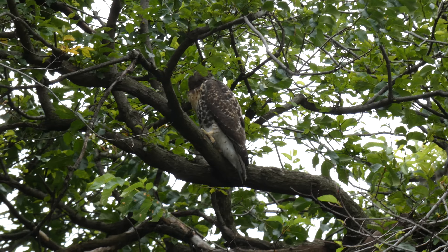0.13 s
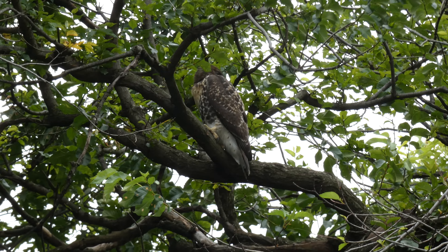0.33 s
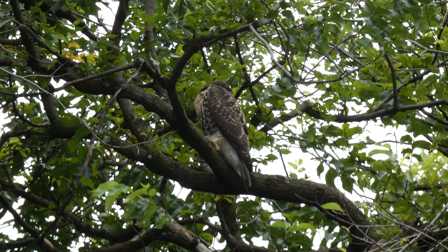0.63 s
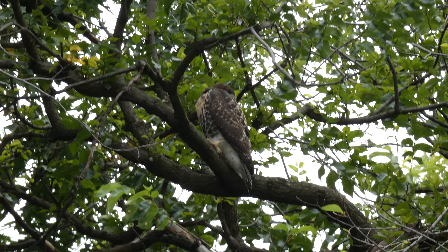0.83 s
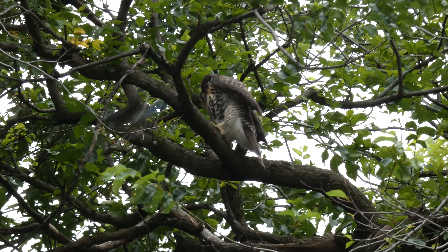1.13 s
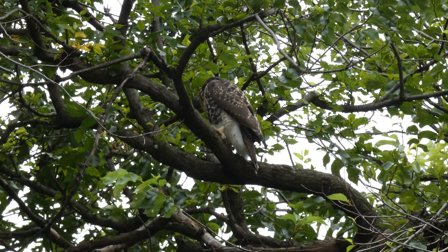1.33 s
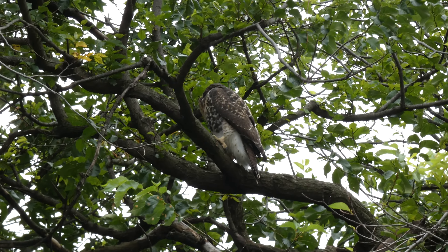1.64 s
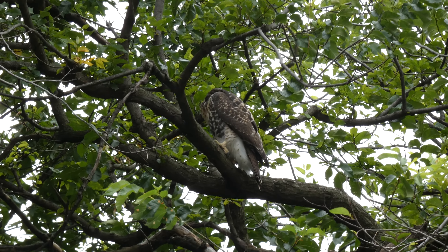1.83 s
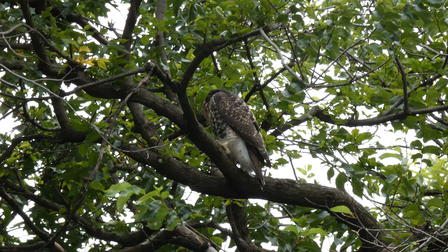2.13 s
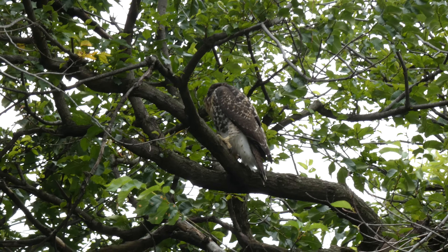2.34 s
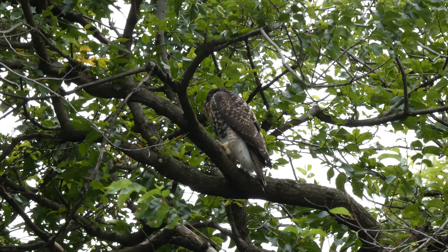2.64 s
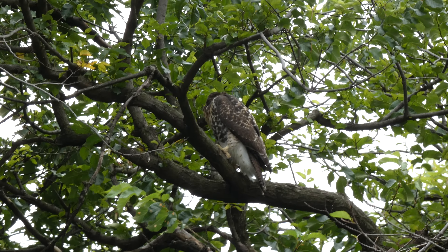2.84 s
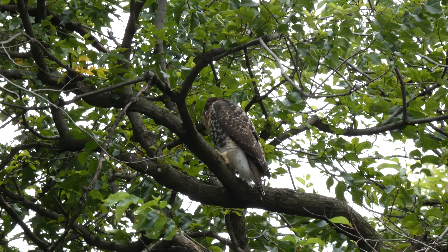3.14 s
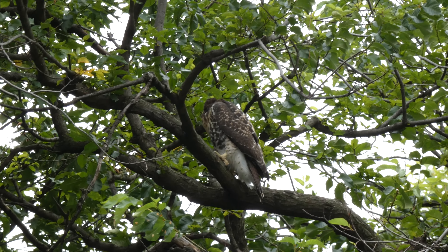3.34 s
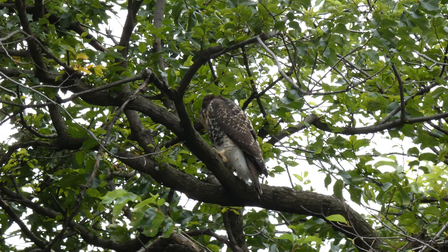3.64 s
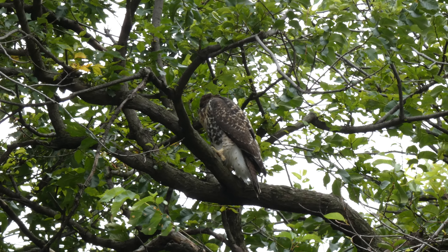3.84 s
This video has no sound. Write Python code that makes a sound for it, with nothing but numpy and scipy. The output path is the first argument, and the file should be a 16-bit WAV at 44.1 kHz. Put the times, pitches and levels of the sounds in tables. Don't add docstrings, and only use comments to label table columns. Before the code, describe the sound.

Four piercing jay screeches rise quickly, sag and end hoarse, echoing among park branches. One distant dog bark precedes them, with tiny bird chirps, leaf rustle, microphone bumps and constant low traffic drone.

```python
import sys
import numpy as np
from scipy import signal
from scipy.fft import rfft, irfft
from scipy.io import wavfile
from scipy.ndimage import uniform_filter1d

SR = 44100
rng = np.random.default_rng(int(sys.argv[2]) if len(sys.argv) > 2 else 0)


def materialize(psi):
    bounded = np.clip(np.atleast_2d(psi).T, -1, 1)
    quanta = np.round(bounded * 32767).astype(np.int16)
    wavfile.write(sys.argv[1], SR, quanta)


def invert_db(level):
    return 10 ** (np.asarray(level, dtype=float) / 20)


N = 176400
T = np.arange(N) / SR


def colour(x, points):
    hz, db = np.array(points).T
    f = np.maximum(np.arange(N // 2 + 1) * SR / N, 1)
    gain = invert_db(np.interp(np.log(f), np.log(hz), db))
    return irfft(rfft(x) * gain, N)


def unit(x):
    return x / np.sqrt(np.mean(x ** 2))


def walk(rate):
    k = int(SR / rate)
    held = np.repeat(rng.standard_normal(N // k + 1), k)
    return 1.3 * uniform_filter1d(uniform_filter1d(held, k), k)[:N]


def ramp(t, span):
    return np.clip(t / span, 0, 1)


def pan(x, db):
    return x * invert_db(np.array([[db / 2], [-db / 2]]))


STIR = .3


def tail(x, t60, db, gap):
    t = T[:SR]
    h = rng.standard_normal((2, SR)) * invert_db(-60 * t / t60) * ramp(t, gap)
    h = h / np.sqrt(np.sum(h ** 2, axis=1, keepdims=True))
    stir = (1 + STIR * np.array([walk(220), walk(220)])) / np.hypot(1, STIR)
    return invert_db(db) * signal.fftconvolve(x[None], h, axes=1)[:, :N] * stir


BEAT = .4


def beating(phase, rate):
    return (1 + BEAT * walk(rate)) * np.sin(phase) + BEAT * walk(rate) * np.cos(phase)


# hz, density_db (per Hz)
CITY = [(60, -12), (110, -5), (330, -2.5), (600, -8.5), (1400, -18.5), (3500, -26), (7000, -39),
        (10500, -70.5)]
# centre_hz, width_hz, level_db
DRONES = [(113, 16, -50), (223.5, 11, -44), (278.3, 5.6, -40), (336.7, 9.9, -41), (591.2, 15, -43),
          (670.4, 27, -48.5), (931, 5, -62)]
# hz, side_over_mid_db, left_over_right_db
WIDTH = [(40, -8, 4), (150, -13.5, 2), (296, -12.5, 2), (700, -8, -1.1), (1440, -6, -1.5),
         (4000, -10.5, 1.5), (12000, -2, 0.5)]
# time_s, gain_db
BREEZE = [(.25, 4), (1.5, 4), (2.8, 5), (4, 2)]
CITY_DB, SWELL_DB, QUIVER_DB = -30, 0.43, 1.18


def city():
    width_points = np.array(WIDTH)
    pair, swell = 0, walk(1.8)
    base = unit(colour(rng.standard_normal((2, N)), CITY)) * invert_db(CITY_DB)
    breeze_db = np.interp(T, *np.array(BREEZE).T)
    for hz in 30 * 2. ** np.arange(10):
        band = colour(base, [(hz / 2, -40), (hz / 1.9, -26), (hz / 1.414, -6.02), (hz, 0),
                             (hz * 1.414, -6.02), (hz * 1.9, -26), (hz * 2, -40)])
        pair = pair + band * invert_db(SWELL_DB * swell + QUIVER_DB * walk(8.97) + (hz > 3000) * breeze_db)
    for hz, width, db in DRONES:
        band = colour(rng.standard_normal((2, N)), [(hz - 3 * width, -50), (hz - width / 2, -3), (hz, 0),
                                                    (hz + width / 2, -3), (hz + 3 * width, -50)])
        pair = pair + invert_db(db + 1.2 * walk(2.93)) * unit(band)
    side = colour(pair[1], width_points[:, :2])
    balance = width_points[:, ::2]
    left = colour(pair[0] + side, balance * [1, .5])
    right = colour(pair[0] - side, balance * [1, -.5])
    return np.array([left, right])


# centre_s, length_s, level_db, centre_hz
RUSTLES = [
    (.64, .015, -56, 5000),
    (1.135, .028, -41, 4300),
    (1.14, .022, -49, 7500),
    (1.37, .02, -50, 3500),
    (1.995, .025, -56, 9500),
]


def rustles():
    out = np.zeros(N)
    for s, length, db, hz in RUSTLES:
        band = [(hz / 2, -20), (hz, 0), (hz * 1.8, -14), (hz * 3, -40)]
        hiss = unit(colour(rng.standard_normal(N), band))
        out = out + invert_db(db + 3 * walk(200)) * hiss * np.exp(-((T - s) / length) ** 2)
    return pan(out, .3)


# start_s, peak_db, mode_hz, t60_s
KNOCKS = [
    (.329, -21, 300, .025),
    (1.3, -22, 300, .03),
    (2.0677, -15, 560, .01),
    (2.0683, -17, 1700, .006),
    (2.0714, -14, 270, .035),
    (3.394, -19, 260, .04),
    (3.7, -27, 235, .3),
    (3.74, -21, 240, .04),
]


def knocks():
    out = np.zeros(N)
    crack = unit(colour(rng.standard_normal(N), [(100, -10), (500, 0), (2200, -6), (4000, -40)]))
    for s, db, hz, t60 in KNOCKS:
        t = np.maximum(T - s, 0)
        out = out + invert_db(db - 60 * t / t60) * np.sin(2 * np.pi * hz * t)
        out = out + (t > 0) * invert_db(db - 17 - 60 * t / .02) * crack
    return pan(out, .3)


# centre_s, length_s, level_db, from_hz, to_hz
CHIRPS = [(.905, .016, -40, 3800, 3700), (.927, .022, -39, 4180, 4020), (.956, .009, -46, 4200, 4450),
          (.973, .006, -45, 4150, 3900), (1.298, .01, -45, 4750, 5150), (1.82, .006, -58, 9900, 9500),
          (1.845, .004, -56, 9800, 9300), (1.93, .005, -57, 10200, 10100), (1.974, .004, -53, 10000, 9200),
          (2.393, .007, -40, 4150, 4500), (2.402, .004, -46, 5200, 5000), (2.407, .004, -41, 4500, 3900),
          (2.42, .015, -46, 3800, 3750)]


def chirps():
    out = np.zeros(N)
    for s, length, db, from_hz, to_hz in CHIRPS:
        u = np.clip((T - s) / length, -2, 2)
        pitch = (from_hz + to_hz) / 2 + (to_hz - from_hz) / 2 * u
        phase = 2 * np.pi * np.cumsum(pitch) / SR
        out = out + invert_db(db) * 2 * np.exp(-2 * u ** 2) * (abs(u) < 2) * np.sin(phase)
    return pan(out, .3) + tail(out, .3, -6, .01)


# time_s, pitch_hz, level_db
BARK = [
    (.44, 341.2, -33.5),
    (.472, 440, -36),
    (0.476, 495.6, -24),
    (0.501, 500.4, -25.5),
    (0.509, 475.2, -33),
    (0.534, 472.5, -29),
    (0.567, 458.4, -36),
]
# multiple, level_db
BARK_PARTIALS = [(1, 5), (2, -1), (3, -6.5), (4, -15), (5, -23)]
# delay_s, level_db
FRONTS = [
    (.105, -6.5),
    (.165, -7.5),
    (.29, -15),
]
BARK_ROUGH, BARK_HALF = .055, .5
BARK_OPEN_S, STREET_T60_S, STREET_DB = 0.042, 1.4, 0


def dog():
    s, hz, db = np.array(BARK).T
    mouth = ramp(T - s[2], BARK_OPEN_S)
    pitch = np.interp(T, s, hz) * (1 + BARK_ROUGH * mouth * walk(250))
    phase = 2 * np.pi * np.cumsum(pitch) / SR
    tones = 0
    for k, g in BARK_PARTIALS:
        if k > 1:
            opening = mouth * (1 + BARK_HALF * walk(60) * np.cos(phase / 2))
        else:
            opening = 1 - 0.14 * mouth
        tones = tones + invert_db(g) * opening * np.sin(k * phase)
    dry = np.sqrt(2) * tones * invert_db(np.interp(T, s, db)) * (T > s[0]) * (T < s[-1])
    thin = colour(dry, [(400, -16.5), (900, 2.5)])
    back = sum(invert_db(g) * np.roll(thin, int(delay * SR)) for delay, g in FRONTS)
    return pan(dry + back, 7.1) + tail(thin, STREET_T60_S, STREET_DB, 0.011)


# multiple, level_db, start_to_end_gain_db
PARTIALS = [(2, -26.5, -1), (3, -19, 2.5), (5, -26, -5), (6, -21, -4), (7, -20.5, -1), (9, -28, -1),
            (10, -25, 6), (11, -39, 14), (12, -28.5, -3), (13, -26, 3), (14, -27, 8), (15, -33, 5),
            (16, -30, 8), (17, -40, 4)]
# multiple, level_db
HALF_LINES = [(3.5, 0.5), (4.5, -5), (5.5, -13), (6.5, -9.5), (7.5, -9.5), (8.5, -19), (9.5, -18),
              (10.5, -18), (11.5, -20), (12.5, -21), (14.5, -22)]
# hz, level_db
RASP = [(1500, -57), (2600, 6), (3400, 0), (4500, 9), (7000, -9), (10000, -7.5), (14000, -34)]
RASP_JITTER, RASP_S, HISS_DB = .003, .07, -45
ATTACK_S, RELEASE_S, ODD_LATE_S = 0.0022, 0.0067, 0.03
FOLLOW, FLICKER_DB, OCTAVE_GAIN_DB = .5, 4, 12
BEAK_DB, BEAK_S = 5, .015
THROB_HZ, THROB = 30, .75


def scream(glide, effort, rest_db, half_from, half_to, half_db, octave_db):
    s, hz = np.array(glide).T
    since, left = T - s[0], s[-1] - T
    rough = ramp(RASP_S - left, 0.024)
    half = ramp(T - half_from, 0.0072) * ramp(half_to - T, 0.018)
    pitch = uniform_filter1d(np.interp(T, s, hz), size=200)
    jitter = RASP_JITTER * (.35 + .8 * rough + .5 * half) * walk(200)
    phase = 2 * np.pi * np.cumsum(pitch * (1 + jitter)) / SR

    push = np.interp(T, *np.array(effort).T)
    smooth = uniform_filter1d(push, size=3000)
    along = ramp(since, s[-1] - s[0]) - .5
    throb = 1 + THROB * half * np.cos(2 * np.pi * THROB_HZ * (T - half_from))
    main = invert_db(push) * throb * beating(4 * phase, 90)
    octave_level = invert_db(smooth + octave_db + OCTAVE_GAIN_DB * along)
    octave = octave_level * ramp(left, .04) * beating(8 * phase, 60)

    swell = rest_db + FOLLOW * (smooth - push.max() + 4)
    beak = BEAK_DB * np.exp(-np.maximum(since, 0) / BEAK_S)
    late = ramp(since - ODD_LATE_S, 0.01)
    rest = 0
    for k, g, gain in PARTIALS:
        flicker = FLICKER_DB * np.minimum(walk(30.11), .6)
        level = invert_db(swell + g + gain * along + (k == 6) * beak + flicker)
        attack = ramp(since, (k != 6) * k * ATTACK_S + 0.006) ** 2
        if k % 2:
            attack = attack * late
        rest = rest + level * attack * ramp(left, k * RELEASE_S) * beating(k * phase + k * k, 70)

    halves = 0
    for k, g in HALF_LINES:
        halves = halves + half * invert_db(half_db + g + FLICKER_DB * walk(50.3)) * beating(k * phase, 90)
    hiss = unit(colour(rng.standard_normal(N), RASP)) * invert_db(HISS_DB + 3 * walk(60))
    noise = hiss * (rough + half + .3)
    voice = np.sqrt(2) * (main + octave + rest + halves) + noise
    return pan(ramp(since, 0.0023) * ramp(left, .004) * voice, 0.33)


# time_s, pitch_hz
PITCH = [
    [(.642, 759.7), (.66, 850), (.685, 887), (.73, 902.7), (.868, 861.7), (.905, 834), (.945, 790),
     (.968, 726)],
    [(1.978, 620), (1.99, 784), (2.006, 856), (2.03, 897), (2.07, 891.6), (2.28, 849), (2.305, 813),
     (2.32, 747)],
    [(2.498, 639), (2.508, 771), (2.52, 864), (2.542, 908.5), (2.61, 890), (2.69, 834), (2.79, 792),
     (2.813, 700)],
    [(3.114, 590), (3.124, 743), (3.138, 860), (3.165, 897), (3.21, 894), (3.356, 820), (3.412, 789),
     (3.432, 677)],
]
# time_s, level_db
EFFORT = [
    [(0.65, -43), (0.682, -37), (0.722, -45), (0.738, -36), (0.756, -34), (0.872, -28), (0.886, -41),
     (0.9, -29), (0.96, -33)],
    [(1.98, -37), (1.988, -33), (2.066, -30), (2.152, -39.5), (2.176, -27), (2.224, -27.5), (2.286, -37),
     (2.308, -30), (2.32, -32)],
    [(2.5, -33), (2.504, -39.5), (2.554, -27), (2.614, -34), (2.622, -44), (2.634, -27), (2.722, -36.5),
     (2.734, -28.5), (2.813, -39)],
    [(3.116, -36.5), (3.126, -35), (3.232, -30), (3.242, -42), (3.268, -26), (3.298, -39.5), (3.362, -28),
     (3.428, -38), (3.432, -40)],
]
# other_partials_db, half_from_s, half_to_s, half_lines_db, octave_db
VOICE = [
    (-25, .838, .93, -42, -15),
    (-26.5, 2.29, 2.5, -42, -15),
    (-26.5, 2.645, 2.71, -46, -21.5),
    (-26, 3.297, 3.34, -44, -17.5),
]
# hz, gain_db
LEAVES = [(3800, 0.5), (5000, 2.5), (9000, -1)]
TREES_T60_S, TREES_DB, ECHO_DB = 1, -5.5, -13


def jay():
    dry = sum(scream(p, e, *v) for p, e, v in zip(PITCH, EFFORT, VOICE))
    echo_left = np.roll(dry[0], 310) - np.roll(dry[0], 731)
    echo_right = np.roll(dry[1], 487) - np.roll(dry[1], 731)
    wet = tail(colour(dry[0], LEAVES), TREES_T60_S, TREES_DB, 0.022)
    return dry + invert_db(ECHO_DB) * np.array([echo_left, echo_right]) + wet + 0.49 * wet[::-1]


def scene():
    return city() + rustles() + knocks() + chirps() + dog() + jay()


# hz, gain_db
MIC = [(20, -51), (45, -8), (70, -0.5), (10000, -1), (11500, -12), (13500, -15), (14950, -18), (15080, -70)]
START_S = .2535


def band_limit(x):
    return signal.sosfilt(signal.butter(12, 15000, fs=SR, output="sos"), x)


def record(dry):
    mix = colour(dry, MIC) * (T > START_S)
    return band_limit(mix)


dry = scene()
out = record(dry)
materialize(out)
```